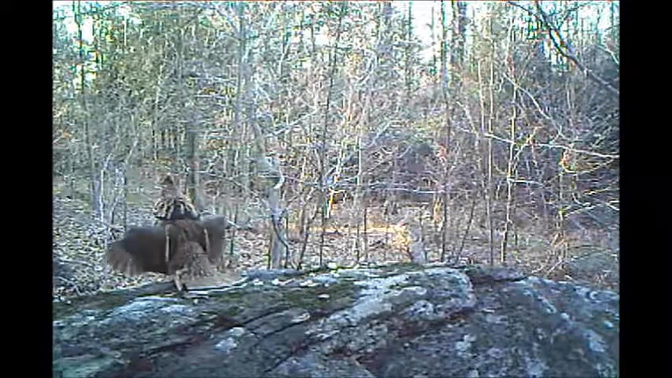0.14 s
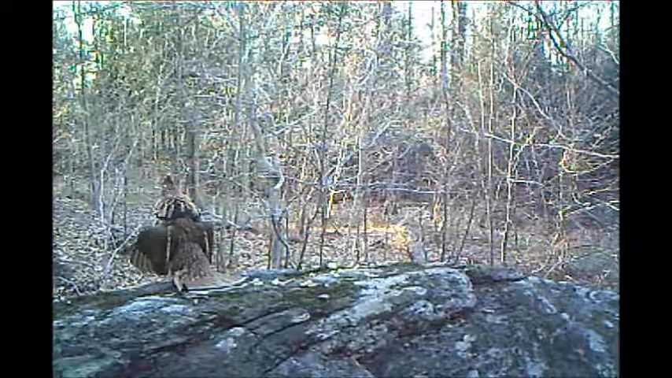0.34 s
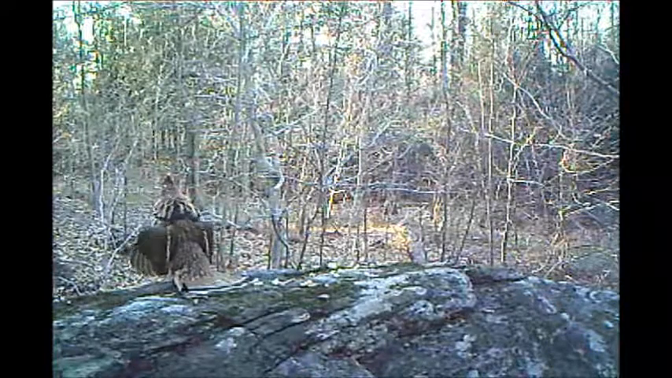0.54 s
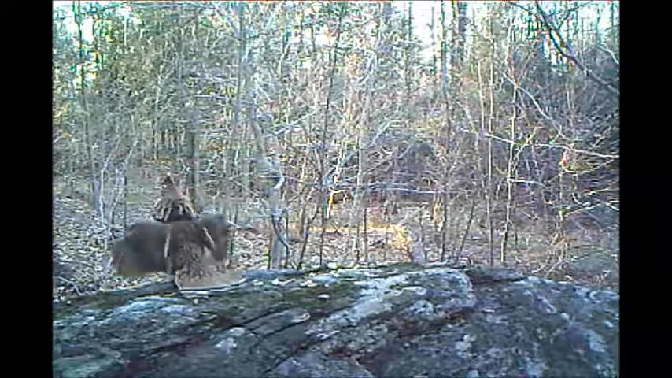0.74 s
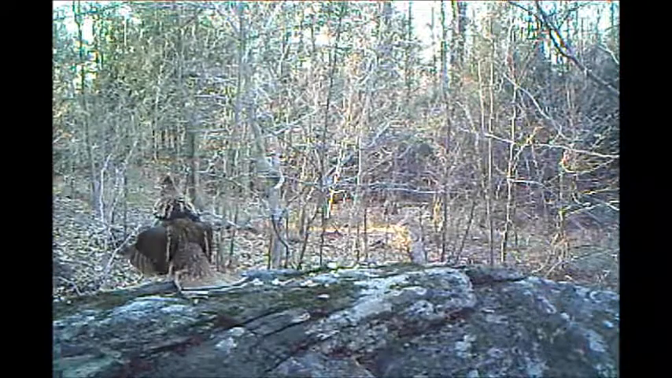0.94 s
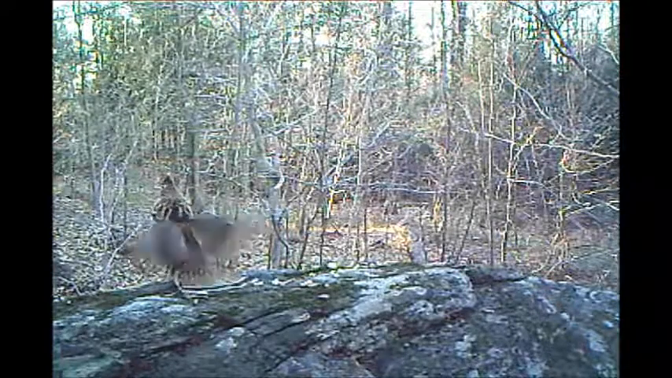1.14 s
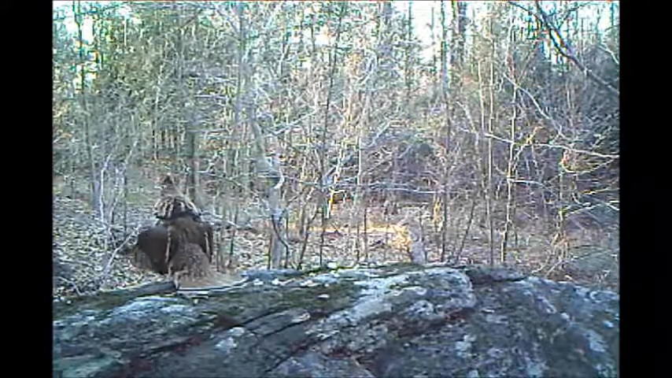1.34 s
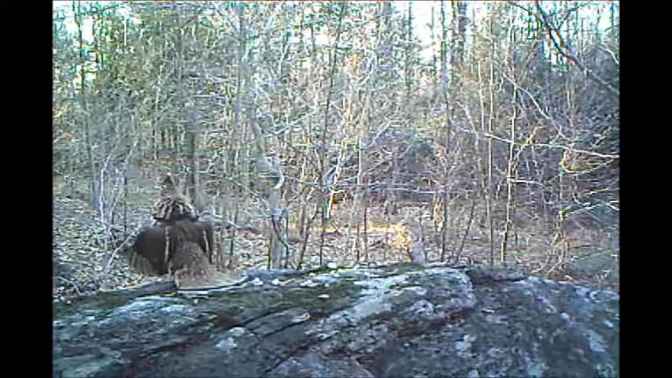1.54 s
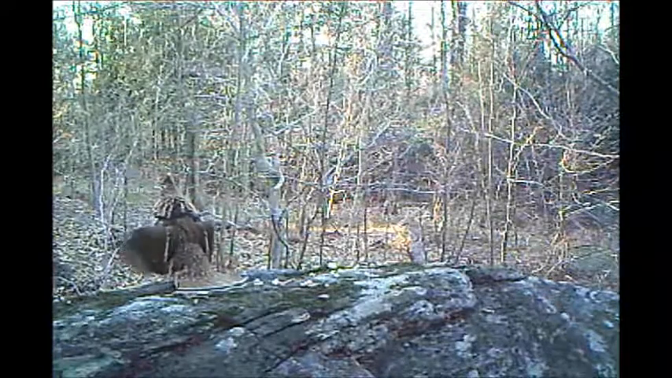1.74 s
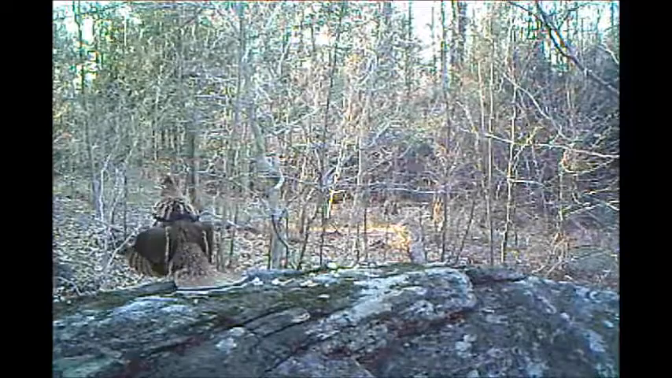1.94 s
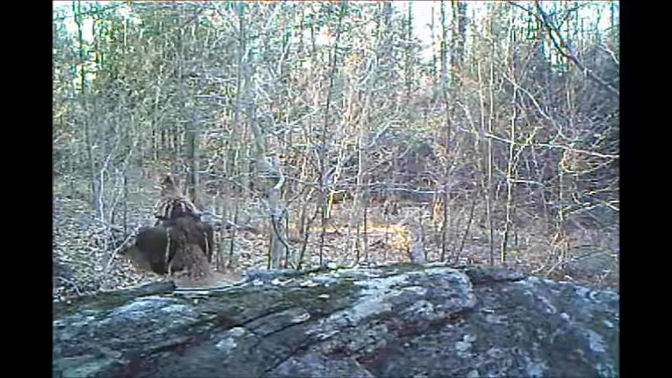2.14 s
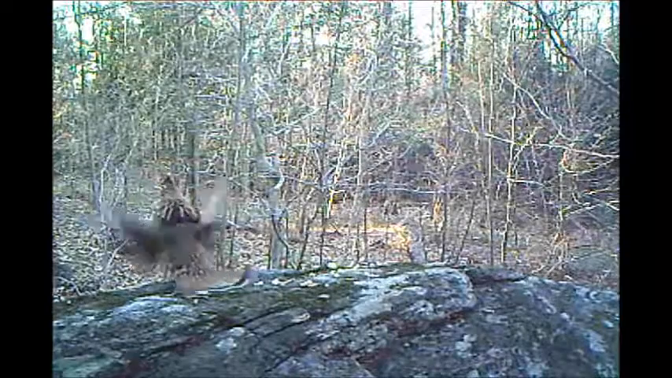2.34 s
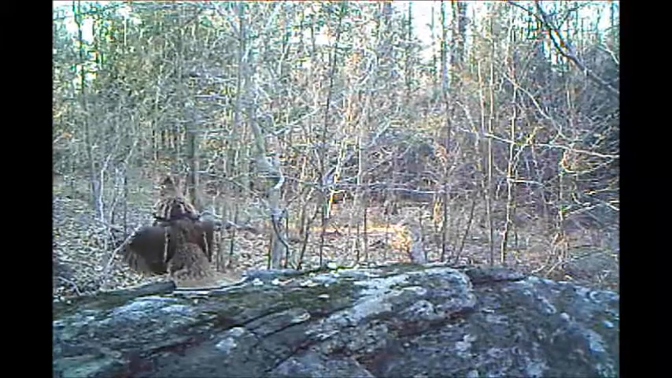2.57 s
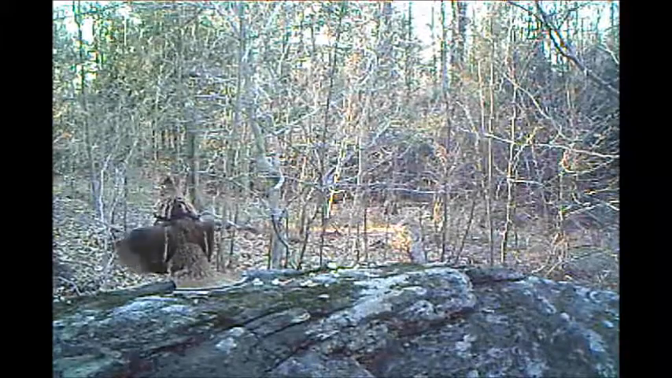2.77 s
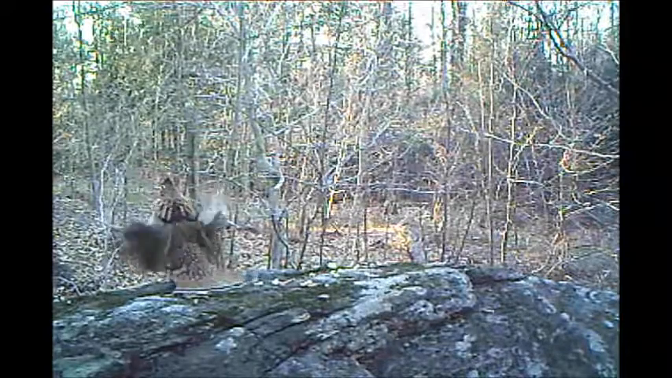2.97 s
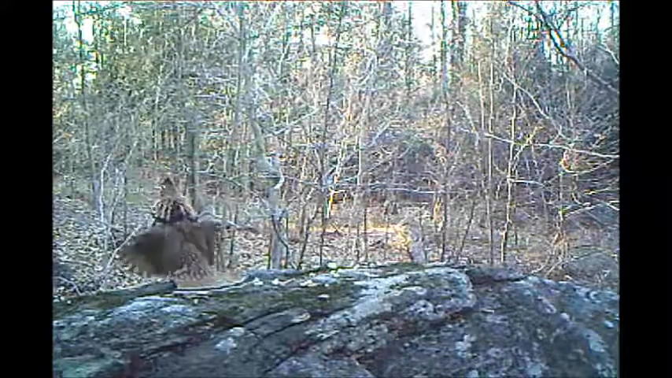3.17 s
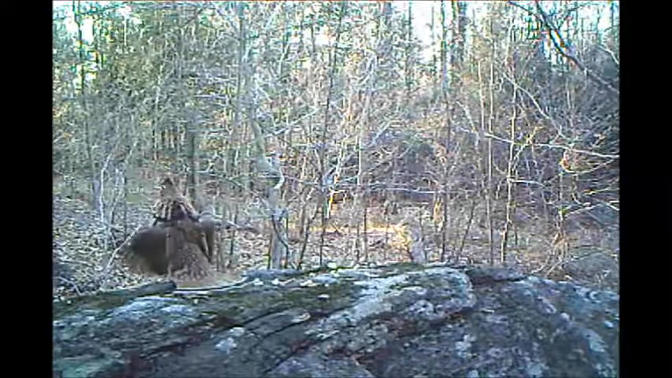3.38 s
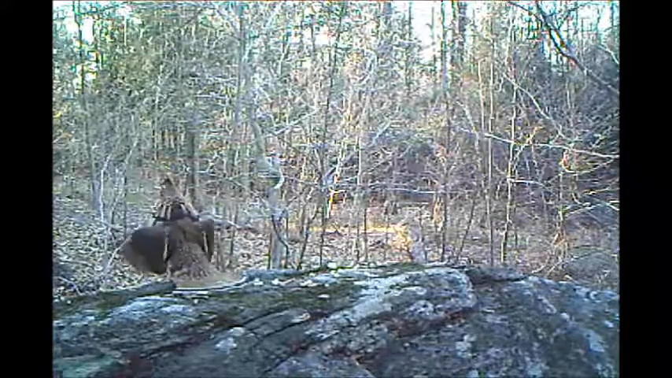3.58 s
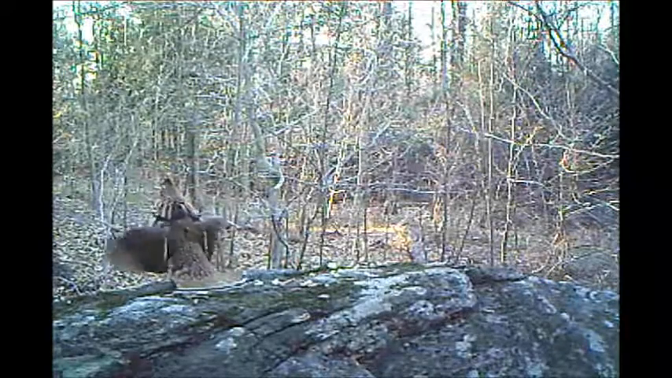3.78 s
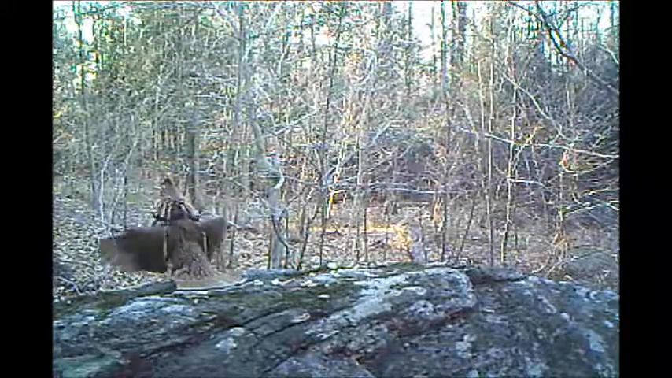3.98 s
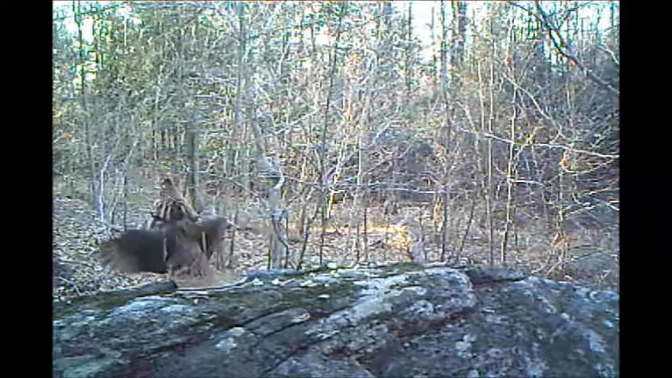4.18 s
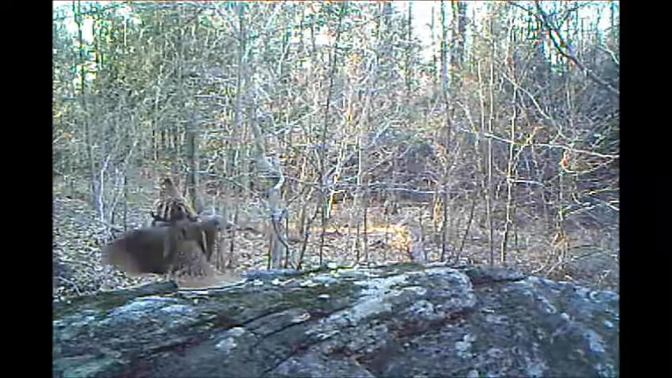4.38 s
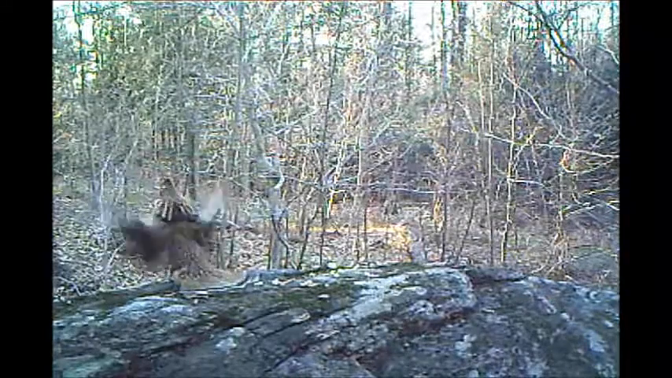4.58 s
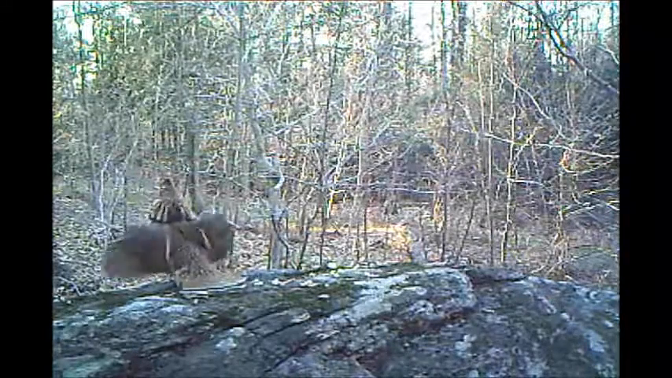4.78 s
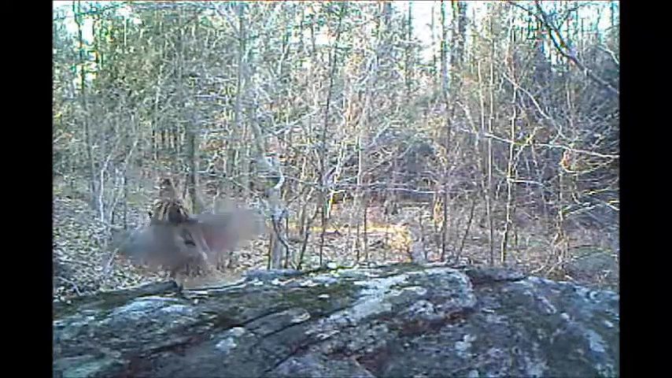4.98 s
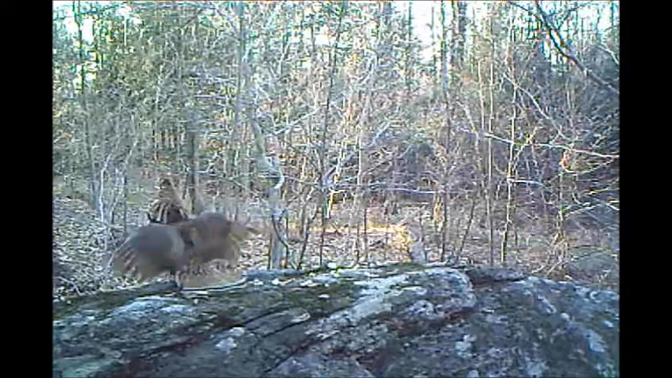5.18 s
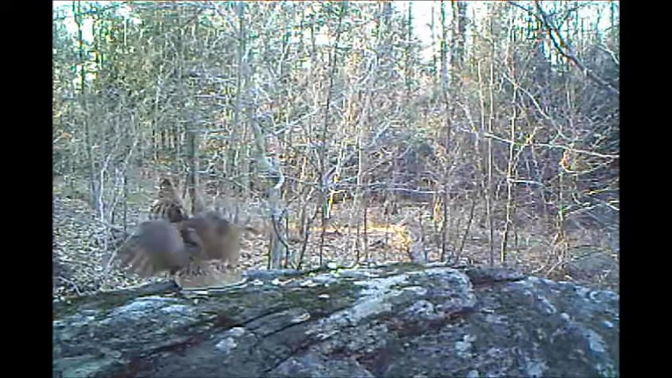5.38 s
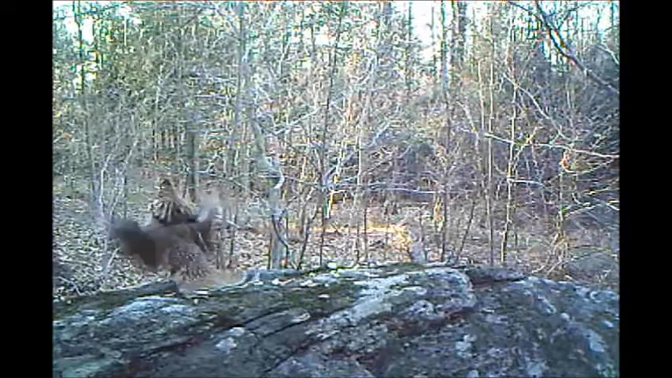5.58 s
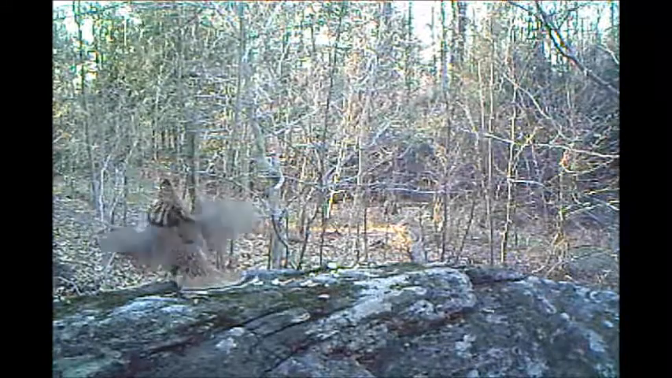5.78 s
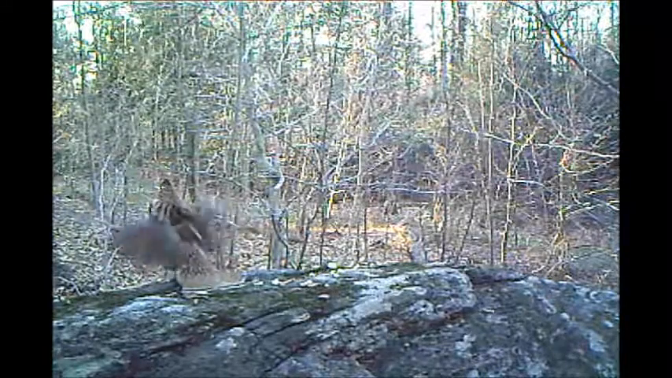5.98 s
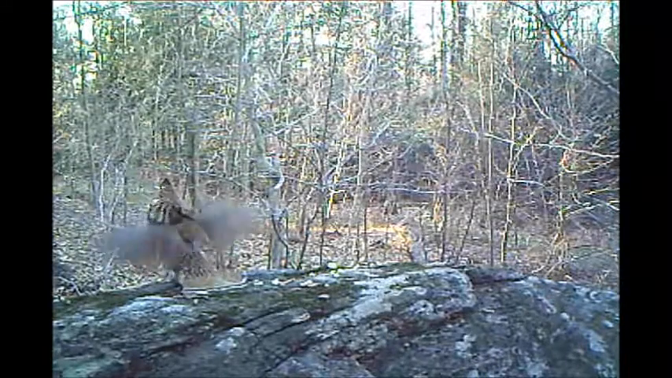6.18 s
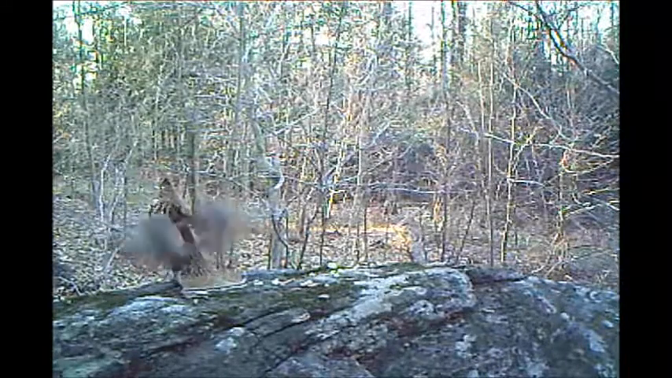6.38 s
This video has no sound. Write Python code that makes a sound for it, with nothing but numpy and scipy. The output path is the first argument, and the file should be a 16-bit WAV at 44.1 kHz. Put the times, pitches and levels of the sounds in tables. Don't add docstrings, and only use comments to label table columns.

```python
import sys
import numpy as np
from scipy import signal
from scipy.fft import rfft, irfft
from scipy.io import wavfile

SR = 44100
rng = np.random.default_rng(int(sys.argv[2]) if len(sys.argv) > 2 else 0)


def makeup_ratio(level_db):
    decades = np.asarray(level_db, float) / 20
    return 10 ** decades


def file_out(sig):
    cols = np.atleast_2d(sig).T
    lim = np.clip(cols, -1, 1)
    pcm = np.round(lim * 32767).astype(np.int16)
    wavfile.write(sys.argv[1], SR, pcm)


N = 283102
TIME = np.arange(N) / SR

# (frequency [Hz], density [dB per Hz])
AIR_SPECTRUM = [(7.1, -22), (12, 1.5), (31, 1), (80, -11), (115, -12.5), (244, -21.5), (292, -23),
                (371, -25.5), (720, -31.5), (1620, -35.5), (1780, -36.5), (13400, -43.5), (16000, -44)]
# (time [s], level [dB])
AIR_LEVEL = [(0, -57.5), (4, -58), (6.42, -57)]
# (frequency [Hz], level [dB rms])
WHINES = [(8652, -99), (13629, -94)]
# (time [s], pitch [Hz], level [dB])
NOTE = [(0, 2090, -26), (.02, 2205, -9), (.034, 2280, 0), (.047, 2345, -2), (.062, 2400, -3),
        (.078, 2330, -4), (.095, 2200, -16)]
# (time [s], level [dB])
SONG_LEVEL = [(2.69, -78.5), (2.85, -73), (3.4, -70.5), (4.3, -71.5), (4.7, -69), (5.05, -70.5)]
# (time [s], peak level [dB])
TICKS = [
    (1.002, -51.5),
    (1.087, -63),
    (1.211, -63),
    (3.142, -58),
]
# (stroke number [-], pause [s])
TEMPO = [(0, .601), (1, .5038), (2, .4356), (3, .3866), (5, .3129), (8, .241), (12, .1788), (18, .1187),
         (24, .0761), (28, .0563), (29, .0472), (31, .0547), (35, .0677)]
# (time [s], thump level [dB], feather level [dB])
EFFORT = [(.18, -21.5, -58.5), (.8, -21, -57.5), (3.3, -20.5, -56.5), (4.8, -21, -55.5),
          (5.2, -21.5, -56.5), (5.4, -22.7, -58), (5.72, -24, -58.5), (6.04, -22.5, -55),
          (6.42, -26, -58.5)]
# (time [ms], width [ms], level [dB], extra level at full roll [dB])
SWISH_PUFFS = [
    (-41, 13, -22, -2),
    (-16, 2.5, -2.5, 0),
    (-10, 2.06, 0.5, -1),
    (-2, 4.55, 1, -6),
    (12, 8.7, -7.5, 3.5),
    (16.5, 1.94, -7.5, 1.5),
]
# (frequency [Hz], density [dB per Hz])
FEATHER_SPECTRUM = [(260, -55), (450, -2), (1220, -6.5), (1360, -5), (1490, -6.5), (1860, -5), (2430, -5),
                    (3090, 3), (4700, -17.5), (8670, -25.5), (10700, -11), (12200, -27), (16000, -71)]
# (time [ms], width [ms], pressure [relative])
SLOW_STROKE = [
    (-12, 6.8, .1),
    (-2.6, 3.7, 1.05),
    (4.5, 1.5, -.06),
    (5.6, 5.8, -.98),
    (14, 3.9, .08),
]
# (time [ms], width [ms], pressure [relative])
QUICK_STROKE = [
    (-17, 3.5, .06),
    (-3.45, 3.75, .96),
    (3.55, 2.15, -.29),
    (6.7, 4.95, -.87),
    (14.5, 2.2, .03),
]
# (pause [s], share of quick shape [0-1], stretch in time [ratio])
PACE = [(.049, 1, 1.02), (.062, 1, 1.1), (.14, 1, 1), (.19, .6, 1), (.36, 0, 1)]
# (delay [ms], level [dB])
ECHOES = [(36, -32), (54, -33), (71, -34)]


def rms_one(x):
    return x / np.sqrt(np.mean(x ** 2) + 1e-20)


def coloured(points):
    hz, db = np.transpose(points)
    grid = np.maximum(np.arange(N // 2 + 1) * SR / N, 1)
    shape = makeup_ratio(np.interp(np.log(grid), np.log(hz), db))
    return rms_one(irfft(rfft(rng.standard_normal(N)) * shape, N))


def band_noise(low_hz, high_hz):
    band = signal.butter(2, [low_hz, high_hz], "band", fs=SR, output="sos")
    return signal.sosfilt(band, rng.standard_normal(N))


def background():
    s, db = np.transpose(AIR_LEVEL)
    hiss = makeup_ratio(np.interp(TIME, s, db)) * coloured(AIR_SPECTRUM)
    phase_drift = np.cumsum(rng.standard_normal(N)) * .028
    for hz, level_db in WHINES:
        hiss += np.sqrt(2) * makeup_ratio(level_db) * np.sin(2 * np.pi * hz * TIME + phase_drift)
    return hiss


def song_notes(count):
    first_s, period_s, hurry_s, hurry_notes = 2.687, .1415, .046, 2.4
    k = np.arange(count)
    s = first_s + period_s * k - hurry_s * (1 - np.exp(-k / hurry_notes))
    return np.transpose([s, np.interp(s, *np.transpose(SONG_LEVEL))])


def woods_reverb(dry):
    t60_s, lag_s, level_db = .45, .025, -2
    lag = np.arange(SR // 2) / SR
    scatter = rng.standard_normal(len(lag)) * makeup_ratio(-60 * lag / t60_s) * (lag > lag_s)
    scatter = scatter / np.linalg.norm(scatter)
    return dry + makeup_ratio(level_db) * signal.fftconvolve(dry, scatter)[:N]


def far_bird():
    count, sag, flutter_db = 18, .035, 4
    after, hz, db = np.transpose(NOTE)
    t = np.arange(round(after[-1] * SR)) / SR
    pitch, envelope = np.interp(t, after, hz), np.interp(t, after, db)
    dry = np.zeros(N)
    bend = 1 + .005 * rng.standard_normal(count)
    bend = bend - sag * np.linspace(-.7, 1, count) ** 2
    for (s, level_db), ratio in zip(song_notes(count), bend):
        phase = 2 * np.pi * np.cumsum(ratio * pitch) / SR
        start = round(s * SR)
        dry[start:start + len(t)] += np.sqrt(2) * makeup_ratio(level_db + envelope) * np.sin(phase)
    gusts = np.interp(TIME, np.arange(0, 7, .012), rng.standard_normal(584))
    return woods_reverb(dry * makeup_ratio(flutter_db * gusts))


def ticks():
    clicks = np.zeros(N)
    for s, db in TICKS:
        clicks[round((s + .001) * SR)] = makeup_ratio(db + 14)
    return signal.sosfilt(signal.butter(2, [400, 4200], "band", fs=SR, output="sos"), clicks)


def strokes():
    first_s = .183
    number, pause = np.transpose(TEMPO)
    pauses = np.exp(np.interp(np.arange(number[-1] + 1), number, np.log(pause)))
    s = first_s + np.append(0, np.cumsum(pauses))
    at, thump_db, feather_db = np.transpose(EFFORT)
    return np.transpose([s, np.interp(s, at, thump_db), np.interp(s, at, feather_db)])


def gaps():
    return np.gradient(strokes()[:, 0])


def near(s):
    span = slice(max(round((s - .06) * SR), 0), min(round((s + .06) * SR), N))
    return span, (TIME[span] - s) * 1000


def bump(ms, width_ms):
    return np.exp(-.5 * (ms / width_ms) ** 2)


def fading(power, ms):
    keep = np.exp(-1000 / (ms * SR))
    return signal.lfilter([1 - keep], [1, -keep], power)


def swish_power():
    power = np.zeros(N)
    beats, pauses = strokes(), gaps()
    chance = rng.standard_normal((len(beats), len(SWISH_PUFFS), 2))
    for (s, _, db), luck, hurry in zip(beats, chance, pauses.min() / pauses):
        span, ms = near(s)
        for (at, width, puff_db, roll_db), (early, loud) in zip(SWISH_PUFFS, luck):
            level = makeup_ratio(db + puff_db + hurry * roll_db + 1.64 * loud)
            power[span] += (level * bump(ms - at - .5 * early, width)) ** 2
    return power


def feathers():
    barb_ms, barb_db = 1.2, 3
    tail_ms, tail_db = 12.7, -7.5
    linger_ms, linger_db = 110, -14.5
    buffet_hz, buffet_db = 310, -3
    power = swish_power()
    jerks = np.arange(0, N, barb_ms * SR / 1000)
    grain = makeup_ratio(barb_db * np.interp(np.arange(N), jerks, rng.standard_normal(len(jerks))))
    brush = power + makeup_ratio(tail_db) ** 2 * fading(power, tail_ms)
    swell = np.sqrt(brush * grain ** 2 + makeup_ratio(linger_db) ** 2 * fading(power, linger_ms))
    swish = swell * makeup_ratio(1.5) * coloured(FEATHER_SPECTRUM)
    buffet = np.sqrt(brush) * makeup_ratio(buffet_db) * rms_one(band_noise(90, buffet_hz))
    return swish + buffet


def lobe(ms, width_ms):
    return 1 / np.cosh(ms / width_ms) ** 2


def thumps():
    direct = np.zeros(N)
    gap, quick, stretch = np.transpose(PACE)
    for (s, db, _), pause in zip(strokes(), gaps()):
        span, ms = near(s)
        share = np.interp(pause, gap, quick)
        shape = (1 - share) * np.array(SLOW_STROKE) + share * np.array(QUICK_STROKE)
        ms = ms / np.interp(pause, gap, stretch)
        direct[span] += makeup_ratio(db) * sum(p * lobe(ms - at, width) for at, width, p in shape)
    late = sum(makeup_ratio(db) * np.interp(TIME - ms / 1000, TIME, direct) for ms, db in ECHOES)
    return direct + late


def scene():
    mix = background() + far_bird() + ticks() + feathers() + thumps()
    return mix[None]


def low_pass(x):
    return signal.sosfilt(signal.butter(12, 16510, fs=SR, output="sos"), x)


def record(dry):
    mic_low_hz, grit_low_hz, grit_db, top_hz = 7.1, 3100, -37, 15750
    dropout_s, dropout_samples = 4.37067, 8
    x = signal.lfilter(*signal.butter(1, mic_low_hz, "high", fs=SR), dry)
    grit_filter = signal.butter(1, grit_low_hz, "high", fs=SR, output="sos")
    grit = signal.sosfilt(grit_filter, rng.standard_normal(x.shape))
    x = x + makeup_ratio(grit_db) * np.abs(x) * grit
    x = signal.sosfilt(signal.ellip(10, .2, 28, top_hz, fs=SR, output="sos"), x)
    lost = round(dropout_s * SR)
    x[:, lost:lost + dropout_samples] = 0
    return low_pass(x)


dry = scene()
out = record(dry)
file_out(out)
```